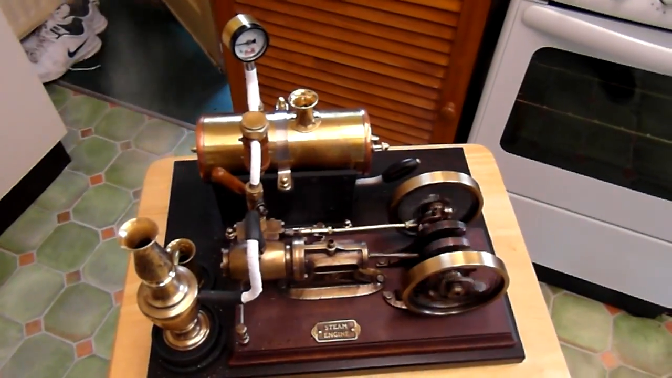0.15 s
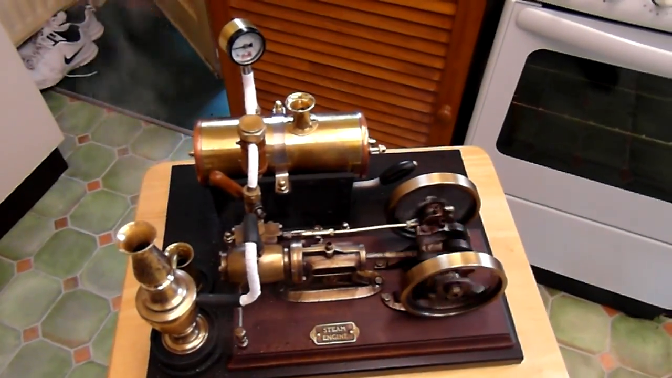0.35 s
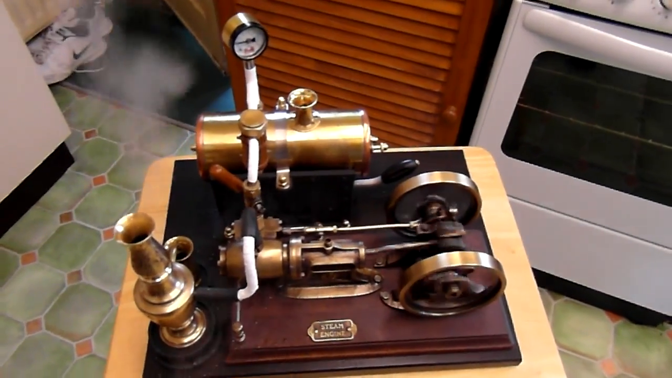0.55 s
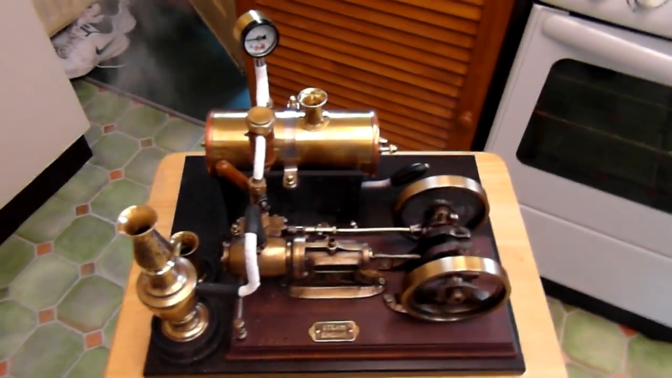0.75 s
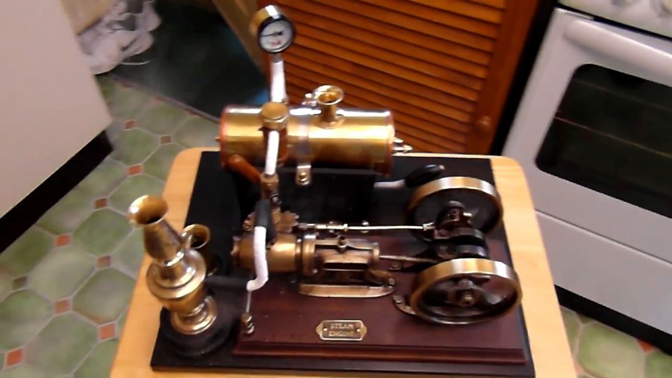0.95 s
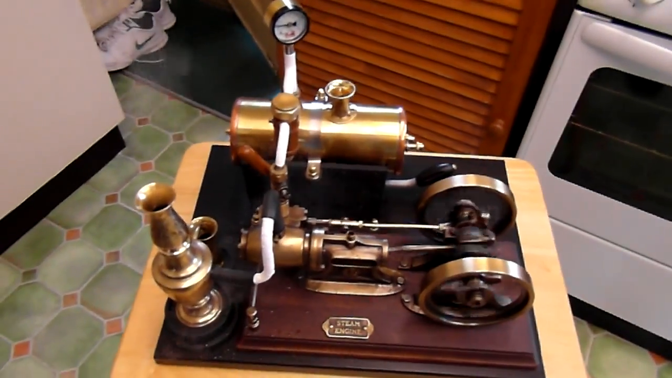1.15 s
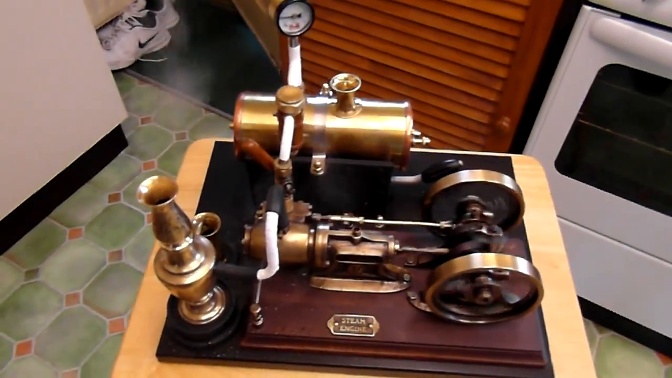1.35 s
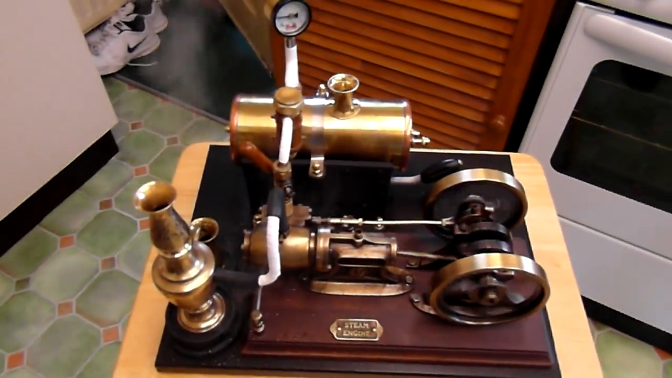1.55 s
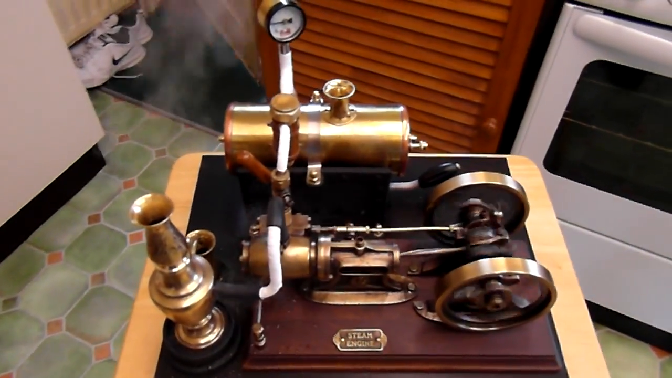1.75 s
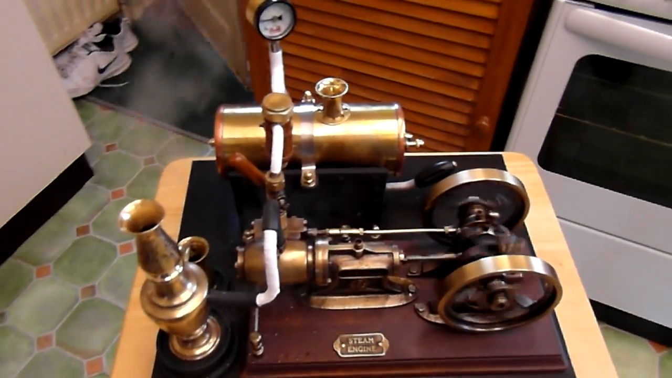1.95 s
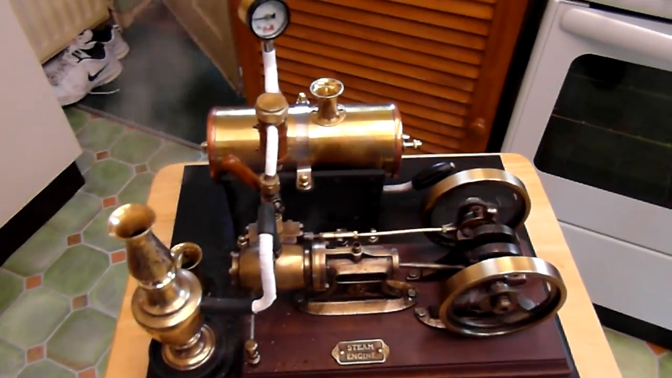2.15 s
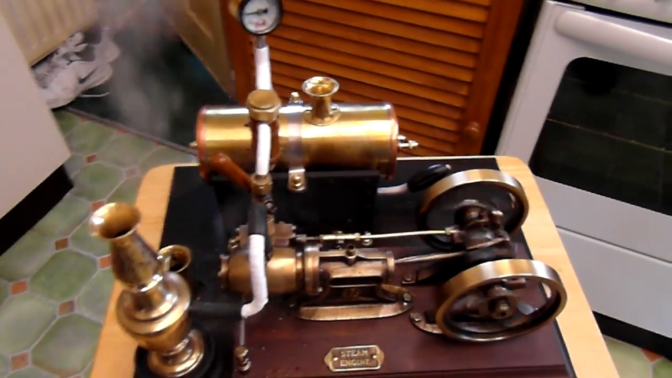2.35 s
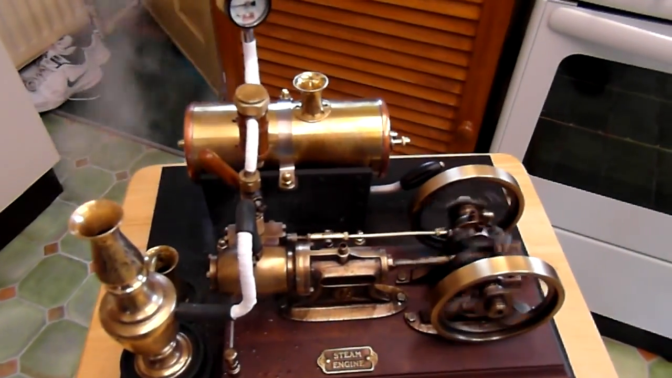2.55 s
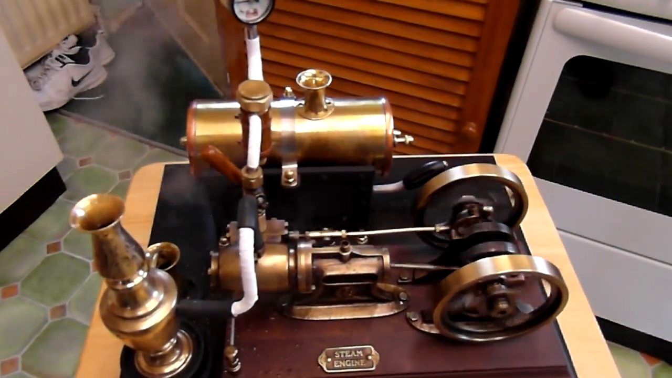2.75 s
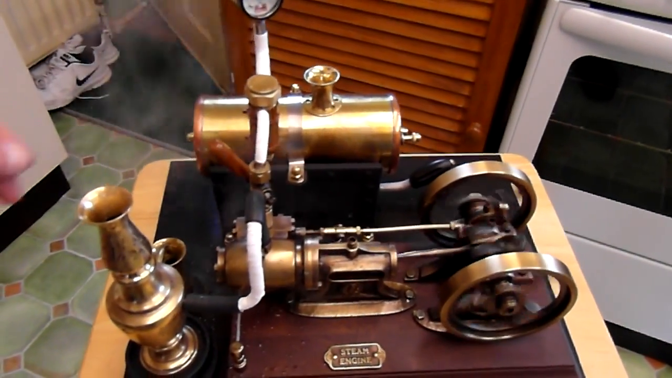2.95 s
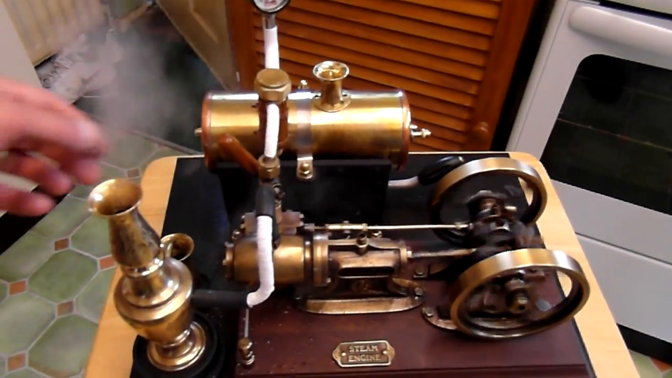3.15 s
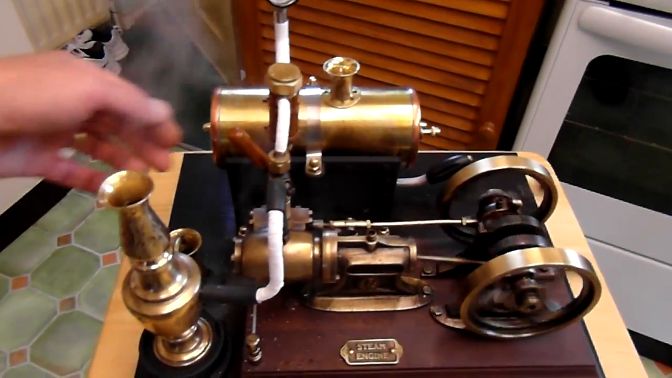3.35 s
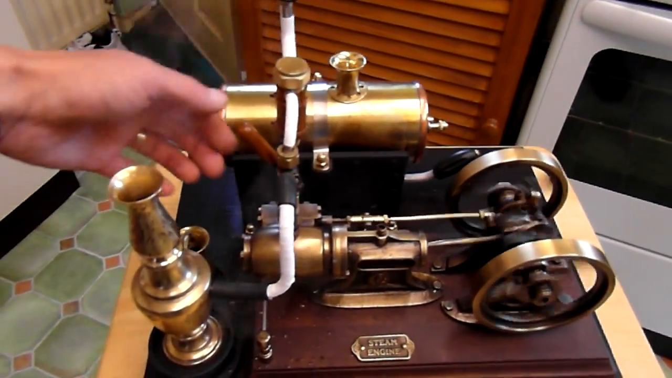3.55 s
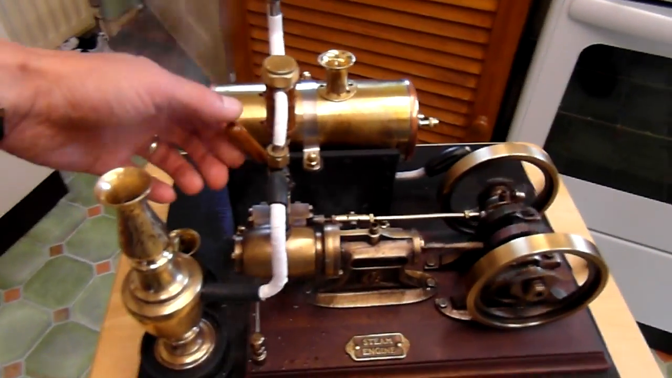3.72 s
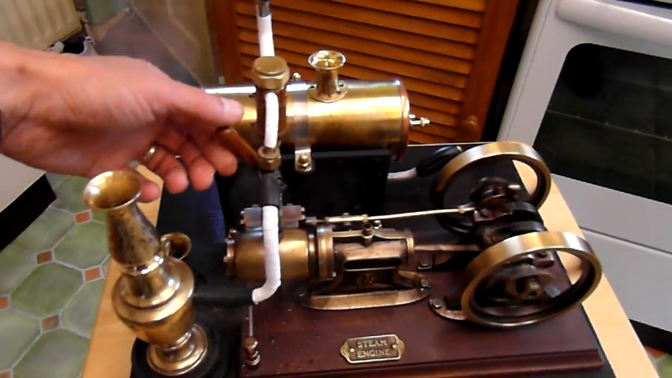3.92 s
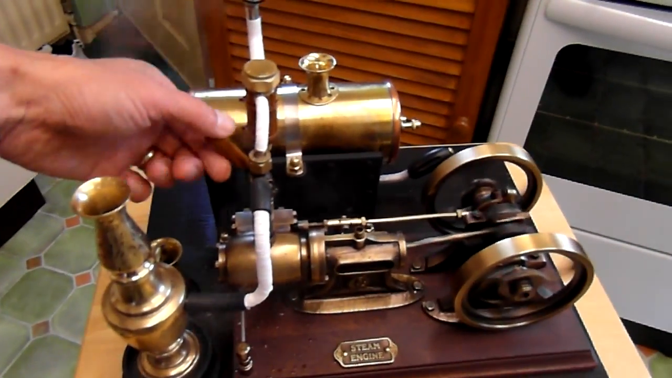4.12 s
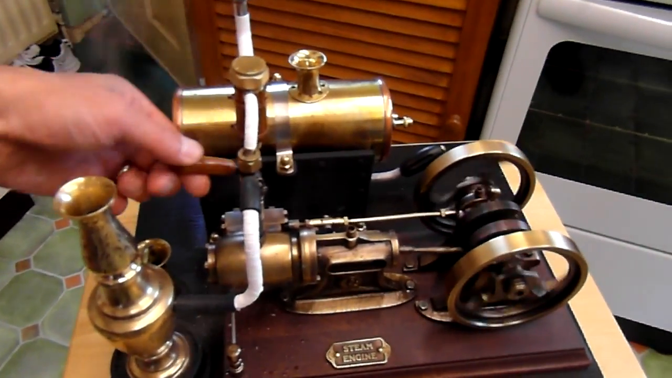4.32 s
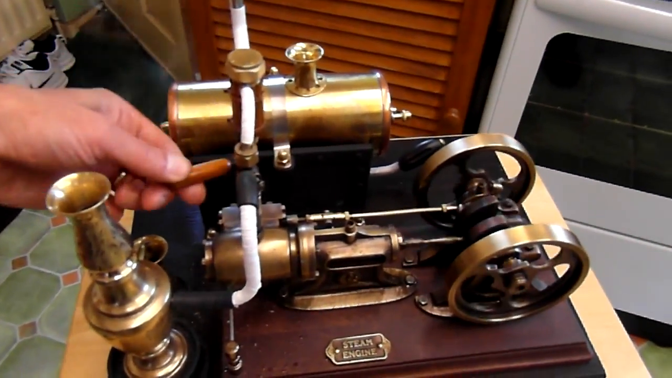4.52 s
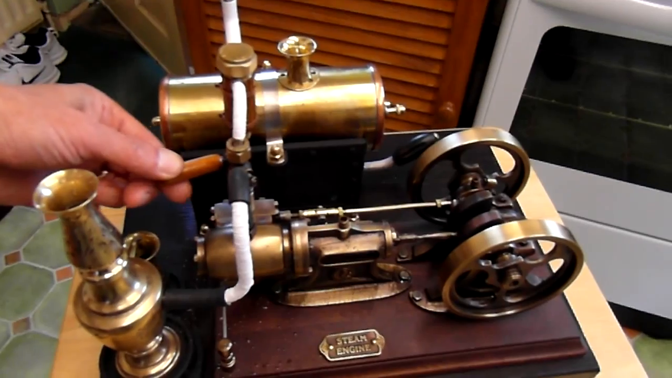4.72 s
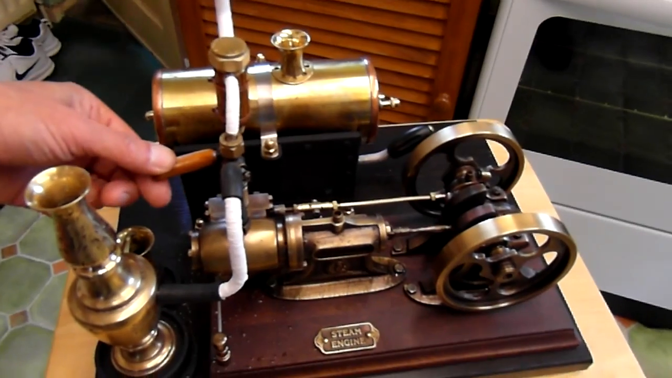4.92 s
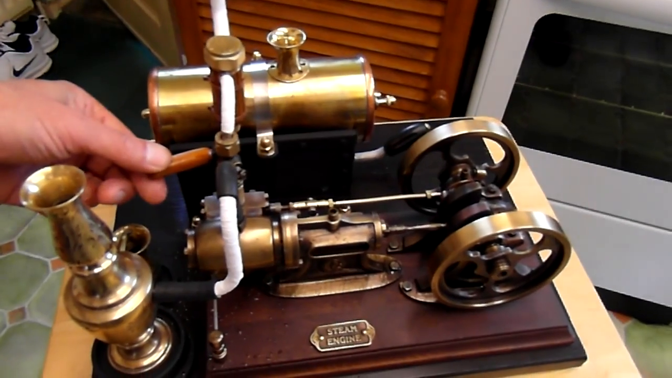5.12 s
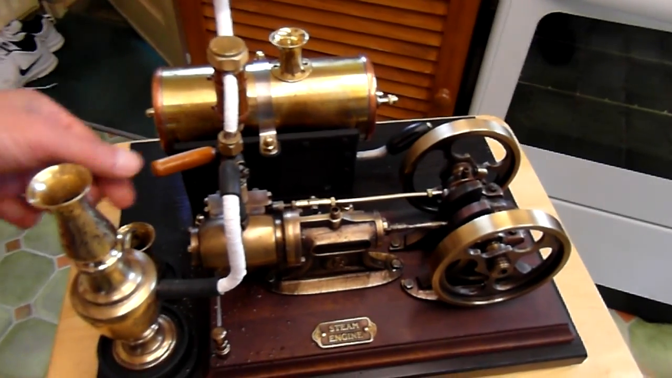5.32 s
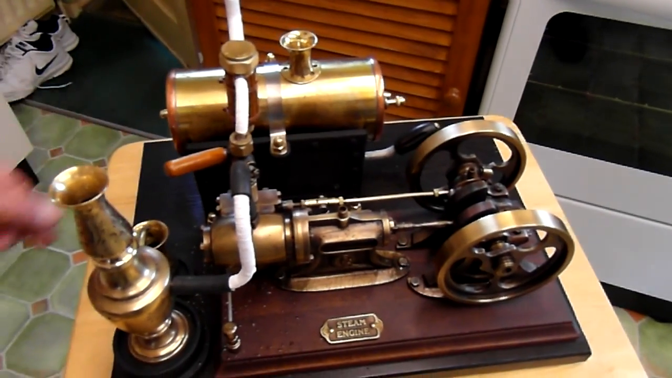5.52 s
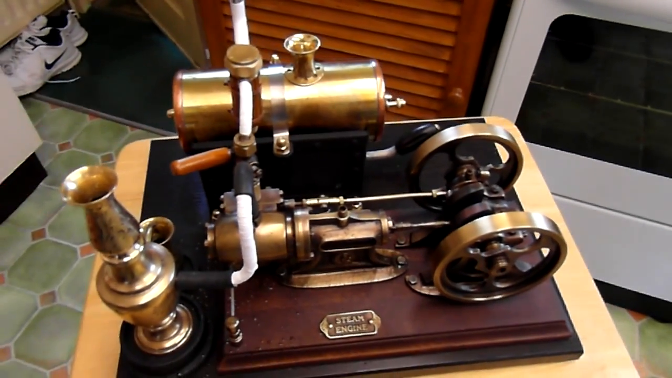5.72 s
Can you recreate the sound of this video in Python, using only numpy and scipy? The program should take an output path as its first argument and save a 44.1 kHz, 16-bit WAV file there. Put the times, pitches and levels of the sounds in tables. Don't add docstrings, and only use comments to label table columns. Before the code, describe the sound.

Small steam engine chuffs briskly with clattering metal knocks and hissing steam, then halts with two knocks, leaving a quiet tiled kitchen.

```python
import sys
import numpy as np
from scipy import signal
from scipy.fft import rfft, irfft, next_fast_len
from scipy.io import wavfile
from scipy.ndimage import map_coordinates

SR = 44100
rng = np.random.default_rng(int(sys.argv[2]) if len(sys.argv) > 2 else 0)


def level_to_linear(level):
    exponent = np.asarray(level, float) / 20
    return 10 ** exponent


def log_audio(samples):
    frames = np.atleast_2d(samples).T
    limited = np.clip(frames, -1, 1)
    pcm = np.round(limited * 32767).astype(np.int16)
    wavfile.write(sys.argv[1], SR, pcm)


N = 254883

# main rod knock t/s, knock level/dB, long chuff before it level/dB,
# short chuff after it level/dB
TURNS = [(-0.0285, -10, -15, -14), (0.2577, -12, -15, -13.5), (0.5439, -11, -16.5, -14),
         (0.833, -9.5, -17, -14.5), (1.1246, -10.5, -15, -12.5), (1.4188, -10.5, -17.5, -11),
         (1.7139, -10, -17.5, -14.5), (2.0111, -10, -16.5, -15), (2.3087, -9, -17.5, -14),
         (2.606, -10, -15, -13.5), (2.9031, -9.5, -15.5, -12.5), (3.2013, -9.5, -16.5, -13),
         (3.5025, -9.5, -17, -13.5), (3.8036, -9, -16.5, -13), (4.1051, -9, -16, -12.5)]


def unit(x):
    return x / np.sqrt(np.mean(x ** 2) + 1e-20)


def along(points, hz):
    f, value = np.transpose(points)
    return np.interp(np.log(hz + 1), np.log(f + 1), value)


def wobble(rate):
    knots = rng.standard_normal(int(N * rate / SR) + 4)
    return map_coordinates(knots, [np.arange(N) * rate / SR])


def filtered(x, response):
    m = next_fast_len(N + SR // 2)
    return irfft(rfft(x, m) * response(np.fft.rfftfreq(m, 1 / SR)), m)[..., :N]


def causal(gain):
    cepstrum = irfft(np.log(gain + 1e-6))
    half = len(cepstrum) // 2
    cepstrum[1:half] *= 2
    cepstrum[half + 1:] = 0
    return np.exp(rfft(cepstrum))[:len(gain)]


def humps(modes, f):
    power = 0
    for center, low, high, db in modes:
        width = np.where(f < center, low, high)
        power = power + level_to_linear(2 * db) / (1 + (2 * (f - center) / width) ** 2) ** 1.634
    return power


def blown(flow, power):
    return filtered(flow * rng.standard_normal(N), lambda f: causal(np.sqrt(power(f))))


def paired(two, alike, gain):
    def mid_side(f):
        turn = np.arccos(np.clip(along(alike, f), -1, 1)) / 2
        return gain(f) * [np.cos(turn), np.sin(turn)]

    mid, side = filtered(two, mid_side)
    return np.array([mid + side, mid - side])


def chuffs(stroke):
    # opens at share of a turn, usual level/dB, open/s, pot hum level/dB
    valve = [
        (-.331, -16.5, .069, -39),
        (.2395, -13.5, .03, -32),
    ]
    share, usual_db, open_s, hum_db = valve[stroke]
    turns = np.array(TURNS)
    start = turns[:, 0] + share * np.gradient(turns[:, 0])
    db = turns[:, 2 + stroke]
    stronger = db - usual_db
    rows = np.c_[start, db, hum_db + 1.6 * stronger, open_s - 0.002 * stronger]
    return [tuple(row) for row in rows if row[0] > 0.01]


def port(rows, level, rise, fall, burst):
    flow = np.zeros(N)
    u = np.arange(SR // 5) / SR
    for row in rows:
        opening = (1 - np.exp(-u / rise)) * (1 + burst * np.exp(-u / 0.026))
        closing = np.exp(-np.maximum(u - row[3], 0) / fall)
        start = int((row[0] - 0.0015) * SR)
        flow[start:][:len(u)] += level_to_linear(row[level]) * opening * closing
    return flow


def steam():
    sputter = level_to_linear(1.5 * wobble(150) + 1.2 * wobble(600))
    long = port(chuffs(stroke=0), 1, rise=0.00095, fall=0.0065, burst=0.16)
    short = port(chuffs(stroke=1), 1, rise=0.0017, fall=0.004, burst=0.3)
    return sputter * (long + short)


def exhaust(flow):
    # t/s, level/dB, pot hum level/dB, open/s
    last_steam = [
        (4.258, -71.5, -43, 0.063),
        (4.358, -40, -62, 0.0198),
    ]
    # f/Hz, width below/Hz, width above/Hz, level/dB
    pipe = [(1441, 170, 430, -20.5), (1978, 280, 200, -1), (3450, 100, 100, -33), (3965, 95, 290, 0),
            (4650, 100, 240, -13), (5814, 100, 830, -4), (6680, 100, 300, -10), (8873, 330, 600, -6.5),
            (9710, 150, 400, -11), (10550, 43, 1800, -15)]
    # f/Hz, level/dB
    jet_floor = [(20, -46), (200, -42), (600, -34.5), (1000, -18), (3000, -24), (8000, -14.5), (11500, -29)]
    # f/Hz, width below/Hz, width above/Hz, level/dB
    pot = [(379, 20, 18, -.5), (417, 38, 26, -1)]
    # f/Hz, width below/Hz, width above/Hz, level/dB
    sigh_pipe = [(1487, 260, 300, -15.5), (2070, 350, 100, 2), (2536, 300, 160, -6)]

    jet = blown(flow, lambda f: humps(pipe, f) + level_to_linear(2 * along(jet_floor, f)))
    rows = chuffs(stroke=0) + chuffs(stroke=1) + last_steam
    hum_flow = port(rows, 2, rise=0.0034, fall=0.013, burst=0)
    hum = blown(hum_flow, lambda f: humps(pot, f))
    sigh_flow = port(last_steam, 1, rise=0.0034, fall=0.002, burst=0)
    sigh = blown(sigh_flow, lambda f: humps(sigh_pipe, f))
    return level_to_linear(5) * jet + level_to_linear(21) * hum + level_to_linear(16) * sigh


def push():
    # f/Hz, width below/Hz, width above/Hz, level/dB
    slug = [(216, 150, 240, -2)]
    rows = [(s, db, 0, 0.006) for s, db, *_ in chuffs(stroke=0) + chuffs(stroke=1)]
    opening = port(rows, 1, rise=0.006, fall=0.0028, burst=0)
    return level_to_linear(-5.5) * blown(opening, lambda f: humps(slug, f))


def wide_hiss(flow):
    # f/Hz, level/dB
    hiss_level = [(20, -40.5), (300, -36), (600, -26.5), (1500, -16), (3000, -21), (7000, -18), (11500, -23)]
    # f/Hz, likeness
    hiss_alike = [(30, .2), (600, 0.39), (3000, .3), (11000, .2)]
    lingering = signal.lfilter([1 / (0.045 * SR)], [1, 1 / (0.025 * SR) - 1], flow)
    hiss = (flow + 0.5 * lingering) * rng.standard_normal((2, N))
    return paired(hiss, hiss_alike, lambda f: level_to_linear(along(hiss_level, f)))


def rods():
    # share of a turn from the main one, scatter/s, level/dB
    slack = [
        (-.282, 0.0011, -14.5),
        (-.101, 0.00025, -17),
        (.334, .0005, -12.5),
    ]
    # t/s, level/dB
    odd_knocks = [
        (-.012, -11.5),
        (4.233, -19.5),
        (4.254, -13.5),
    ]
    # delay/s, level/dB
    bounces = [
        [(0, -4), (.0011, 1), (.0033, -2.5), (.0052, -14)],
        [(0, -2.5), (.003, -8), (.009, -9.5)],
        [(0, -6), (.0015, 4), (.004, -6)],
        [(0, -3.5), (.0065, -4), (.009, -2)],
    ]
    scatter_db = [.7, 1.4, 1.2, 1.2]
    # f/Hz, width/Hz, level/dB from main
    # knock, level/dB from each lesser knock
    body_modes = [(126, 3.5, -25, -23.5, -26.5, -26.5), (150, 30, -34.5, -37, -32, -33.5),
                  (178, 16, -22, -25.5, -23.5, -25), (264, 60, -24.5, -25.5, -26.5, -26.5),
                  (379, 13, -5, -11, -11, -11), (420, 22, -13, -15, -15, -13), (530, 110, -26, -32, -29, -34.5),
                  (738, 33, -13.5, -28, -20, -19.5), (796.7, 29, -11.5, -9.5, -15, -16),
                  (971, 64, -10, -10, -3.5, -8.5),
                  (1140.6, 28, -9, -8.5, -2.5, 1.5), (1291, 51, -3.5, 0, -5, 3),
                  (1384, 78, 0.5, -5.5, -1.5, -17), (1493, 77, -2.5, -2.5, -2.5, -7.5),
                  (1610, 25, 2, -7, 1.5, -11.5), (1628.3, 39, -1, -11, 0, -15.5),
                  (1946, 180, -8, -3.5, -10, -13), (2207, 100, -8, -7.5, -8, -19),
                  (2352, 130, -13, -9.5, -12, -18),
                  (2755, 170, -11, -22.5, -14.5, -25.5), (3294, 150, -12, -18, -15.5, -25.5),
             (4520, 294, -5.5, -5, -9.5, -19), (4547, 180, -3, -14, -13, -10.5),
             (5015, 250, -14.5, -19.5, -17, -29), (5820, 180, -16.5, -26, -25, -30),
             (7820, 350, -12, -20.5, -19.5, -22.5), (9630, 980, -22, -33.5, -18.5, -38)]

    turns = np.array(TURNS)
    s, period = turns[:, 0], np.gradient(turns[:, 0])
    chance = rng.standard_normal((len(s), len(slack)))
    joints = [turns[:, :2]]
    for k, (share, scatter_s, db) in enumerate(slack):
        landing = s + share * period + scatter_s * chance[:, k]
        joints.append(np.c_[landing, np.full(len(s), db)])
    joints[2] = np.vstack([joints[2], odd_knocks])

    def body(f, joint):
        response = 0
        for n, mode in enumerate(body_modes):
            center, width = mode[:2]
            ring = 1j * f * width / (center ** 2 - f * f + 1j * f * width)
            response = response + (-1) ** n * level_to_linear(mode[2 + joint]) * ring
        return response

    out, lead = 0, SR // 5
    for k, hits in enumerate(joints):
        blows = np.zeros(N)
        for delay, db in bounces[k]:
            uneven = 1 + 0.02 * rng.standard_normal(len(hits))
            at = np.round((hits[:, 0] + delay * uneven) * SR).astype(int)
            blows[at + lead] += level_to_linear(hits[:, 1] + db + scatter_db[k] * rng.standard_normal(len(hits)))
        grit = signal.lfilter([1], [1, 1 / (0.016 * SR) - 1], blows) * rng.standard_normal(N)
        out = out + filtered(blows + level_to_linear(-35) * grit, lambda f: body(f, k))
    return level_to_linear(31.5) * np.pad(out[lead:], (0, lead))


def turning():
    late = (np.arange(N) / SR - 4.285) / 0.012
    return 1 / (1 + np.exp(np.clip(late, -50, 50)))


def leaks():
    # f/Hz, level/dB
    seep = [(180, -38.5), (300, -3.5), (447, -5.5), (657, -47), (1120, -2.5), (1650, -1), (1930, 3),
            (2140, 1.5), (3960, -5.5), (11800, -13), (15300, -54.5), (22000, -120)]
    hiss = unit(filtered(rng.standard_normal(N), lambda f: level_to_linear(along(seep, f))))
    return turning() * level_to_linear(-39.5 + 2 * wobble(60)) * hiss


def rumble():
    # f/Hz, level/dB
    table = [(12, -42.5), (20, -7.5), (37, -23), (91, -23.5), (118, -9), (226, -15), (320, -3.5),
             (420, -24.5), (700, -120)]
    alike = [(30, 0.2), (80, 0.5), (200, 0.4)]  # f/Hz, left-right likeness
    shake = paired(rng.standard_normal((2, N)), alike, lambda f: level_to_linear(along(table, f)))
    return turning() * level_to_linear(-58.5 + 4 * wobble(13)) * unit(shake) * level_to_linear([[-0.6], [0.6]])


def leaning(x):
    # t/s, bass level/dB
    boom = [(0, -0.5), (1.2, 0.5), (2.3, 0.5), (2.699, 2.5), (3.6, 2.5), (4.4, 1)]
    bass = filtered(x, lambda f: 1 / (1 + (f / 520) ** 8))
    bass_gain = level_to_linear(np.interp(np.arange(N) / SR, *np.transpose(boom)))
    return x + (bass_gain - 1) * bass


def ports(x, side):
    # f/Hz, left minus right level/dB
    lean = [(25, 1), (60, -6.5), (140, -11.5), (300, -2.5), (1420, -2), (4090, -0.8), (8000, 0.2),
            (10500, -3.5), (11800, 0)]
    # f/Hz, left leads by phase/rad
    lead = [(100, 0.12), (400, -.06), (1200, 0.037), (2500, -.4), (4220, -0.37), (6630, -.8), (9650, -1.1),
            (12000, 0.14)]

    def one_port(f, half):
        return level_to_linear(half * along(lean, f)) * np.exp(1j * half * side * along(lead, f))

    return filtered(x, lambda f: np.array([one_port(f, 0.5), one_port(f, -0.5)]))


def kitchen(x, count=16):
    # f/Hz, t60/s
    decay = [(200, 0.45), (500, 0.34), (1500, 0.24), (5000, 0.25), (11000, 0.18)]
    # f/Hz, likeness
    echo_alike = [(100, 0.69), (400, 0.98), (1000, 0.89), (2000, 0.9), (3500, 0.28), (6000, .3),
                  (11000, .1)]
    # f/Hz, level/dB
    echo_level = [(100, -11), (400, -4), (1400, -6), (3000, -5), (6000, -7), (11000, -5)]

    hz, t, z = signal.stft(rng.standard_normal((count, 2, SR // 3)), SR, nperseg=256)
    dying = level_to_linear(-60 * t / along(decay, hz)[:, None])
    tails = signal.istft(z * dying, SR, nperseg=256)[1]
    step, wet = SR // 3, np.zeros((2, N + SR))
    fade = np.sqrt(np.bartlett(2 * step))
    for k, tail in enumerate(tails):
        start = max(k - 1, 0) * step
        piece = (x[start:(k + 1) * step] * fade[(k == 0) * step:])[None]
        echo = signal.fftconvolve(piece, tail / np.linalg.norm(tail[0]), axes=1)
        wet[:, start + 130:][:, :echo.shape[1]] += echo
    return paired(wet[:, :N], echo_alike, lambda f: level_to_linear(along(echo_level, f)))


def air():
    # f/Hz, level/dB
    room = [(12, -28.5), (25, -21), (45, -16.5), (64, -14), (90, -10.5), (200, -5), (400, -2.5),
            (1000, -3.5), (2000, -8), (11100, -13), (12000, -21), (22000, -120)]
    # f/Hz, likeness
    room_alike = [(60, 0.52), (220, 0.46), (840, 0.3), (3140, 0.3), (11800, -0.04)]
    # f/Hz, rms level/dB
    whine = [(64, -88), (1825, -84.5)]
    hush = paired(rng.standard_normal((2, N)), room_alike, lambda f: level_to_linear(along(room, f)))
    t = np.arange(N) / SR
    tones = sum(level_to_linear(db + 3) * np.sin(2 * np.pi * hz * t) for hz, db in whine)
    return level_to_linear(-64.5 + 0.6 * wobble(8.6)) * unit(hush) + tones


def scene():
    flow = steam()
    breath = leaning(exhaust(flow) + push() + leaks())
    metal = leaning(rods())
    direct = ports(breath, side=0.94) + ports(metal, side=2.01)
    return direct + kitchen(breath + metal) + wide_hiss(flow) + rumble() + air()


def top_cut(x):
    return signal.sosfilt(signal.butter(12, 12360, fs=SR, output="sos"), x)


def record(dry):
    top_hz = 11520

    def band(f):
        haze = level_to_linear(-37.5 - 0.02 * np.abs(f - top_hz)) * (f > top_hz)
        return 1 / np.sqrt(1 + (f / top_hz) ** 300) + haze

    return top_cut(filtered(dry, band))


dry = scene()
out = record(dry)
log_audio(out)
```